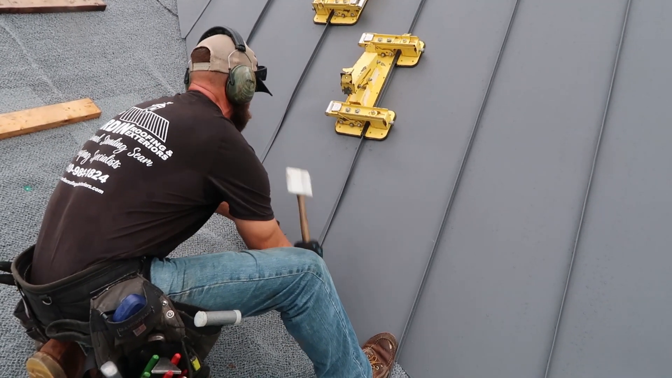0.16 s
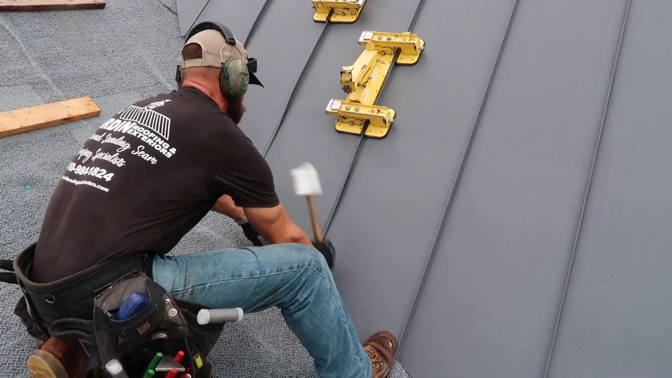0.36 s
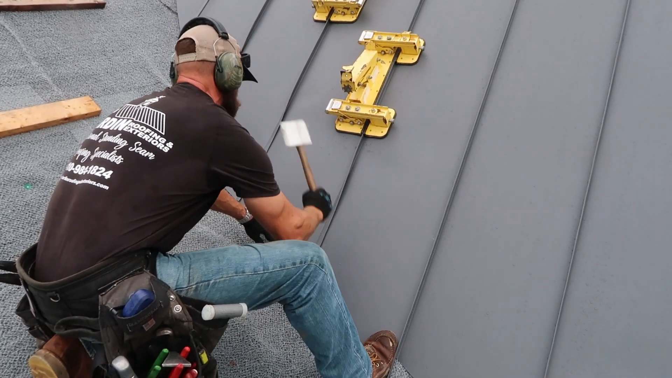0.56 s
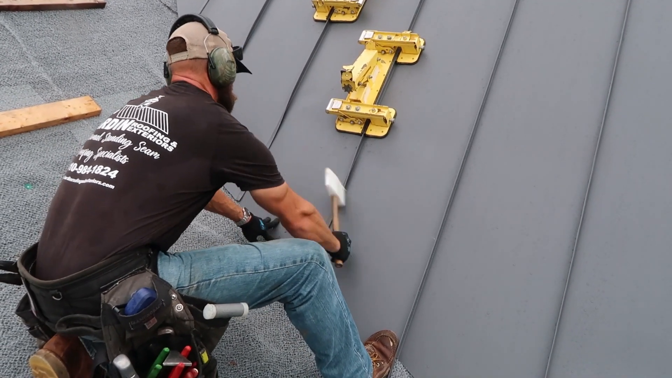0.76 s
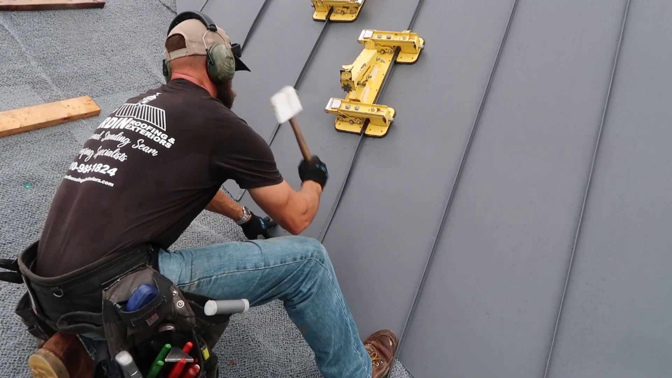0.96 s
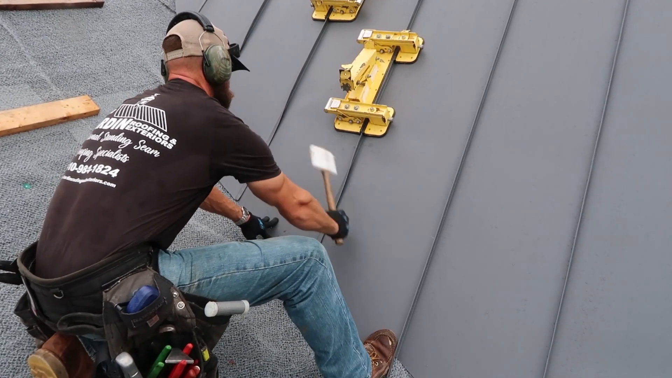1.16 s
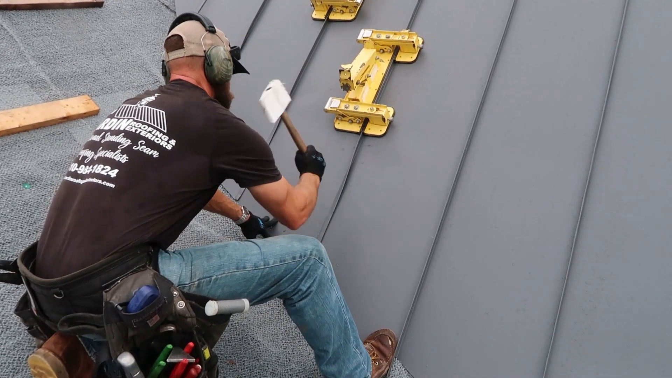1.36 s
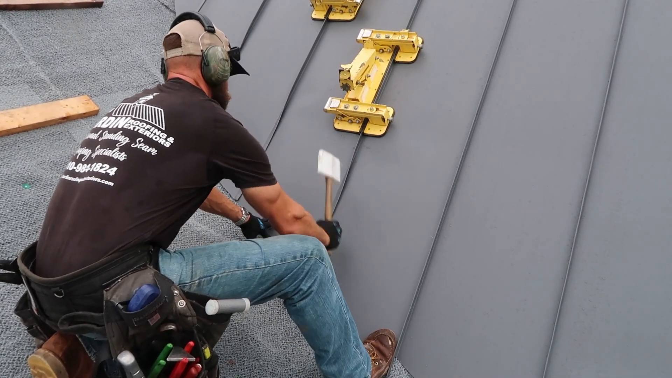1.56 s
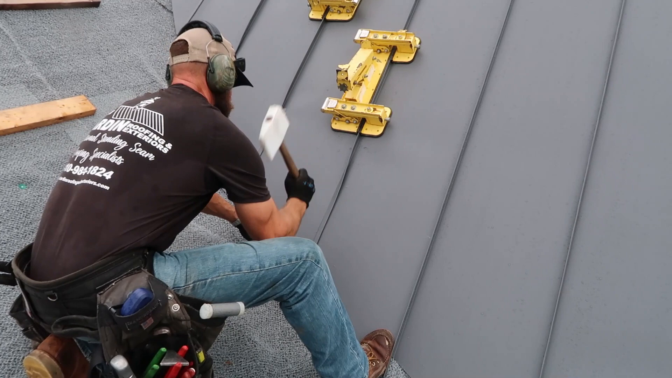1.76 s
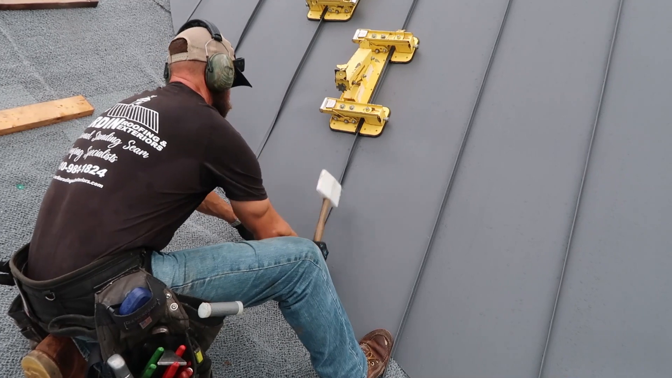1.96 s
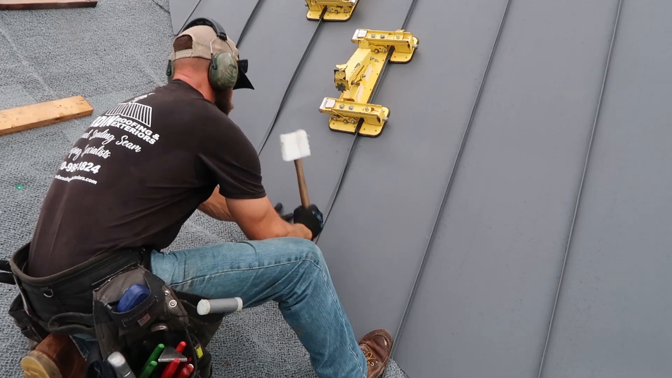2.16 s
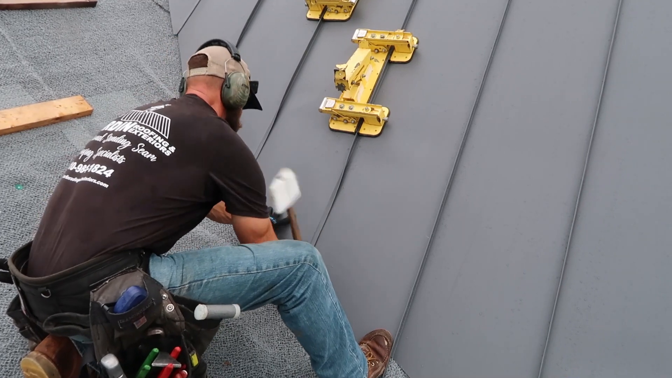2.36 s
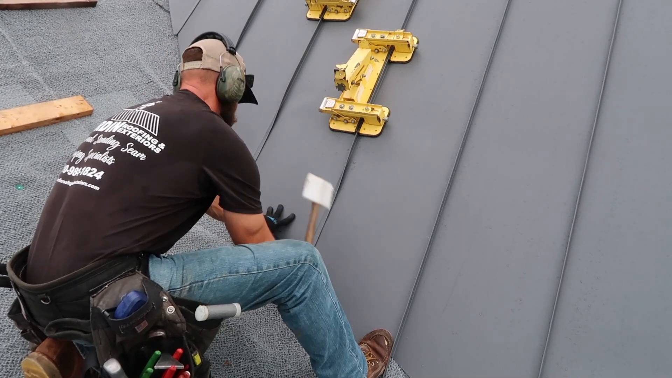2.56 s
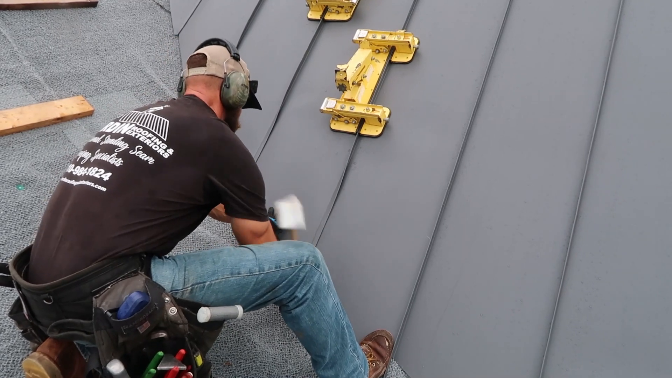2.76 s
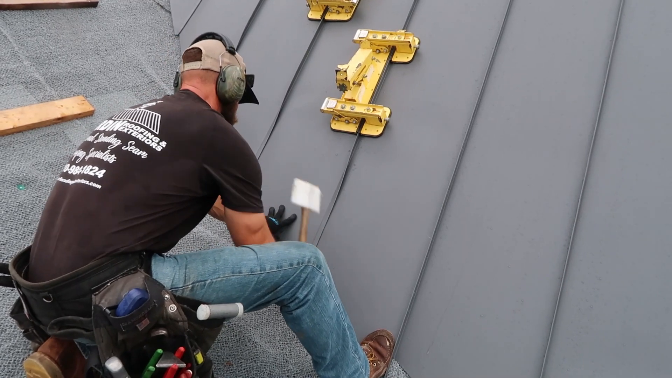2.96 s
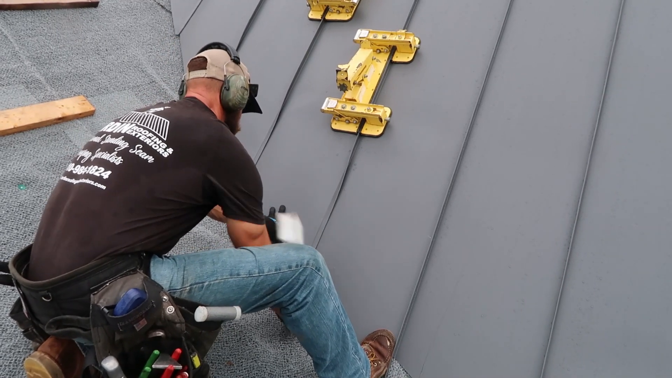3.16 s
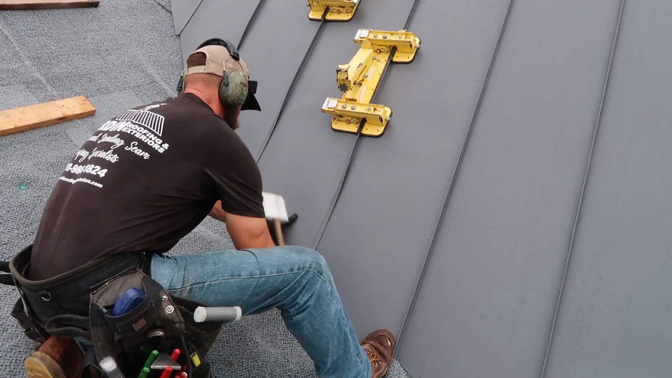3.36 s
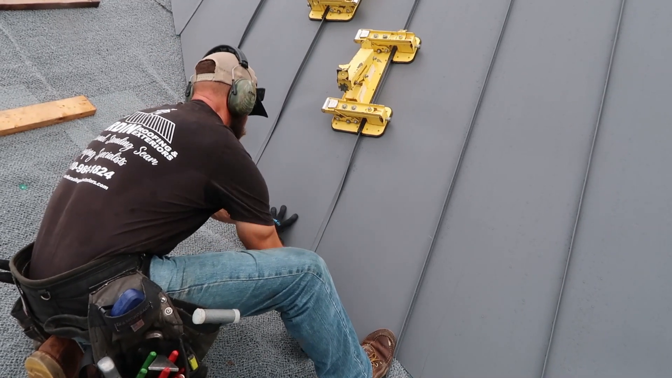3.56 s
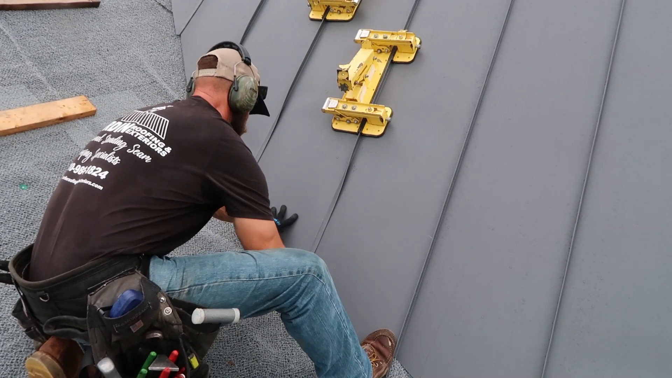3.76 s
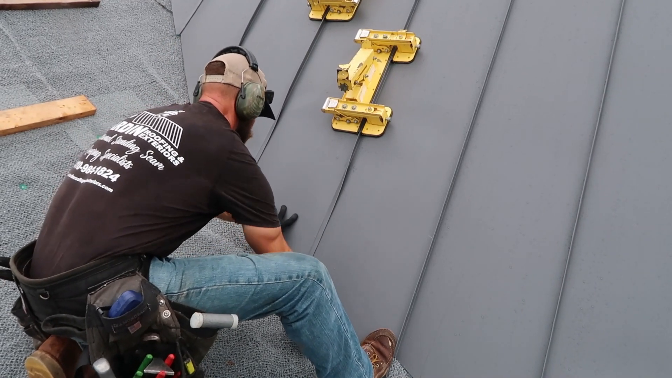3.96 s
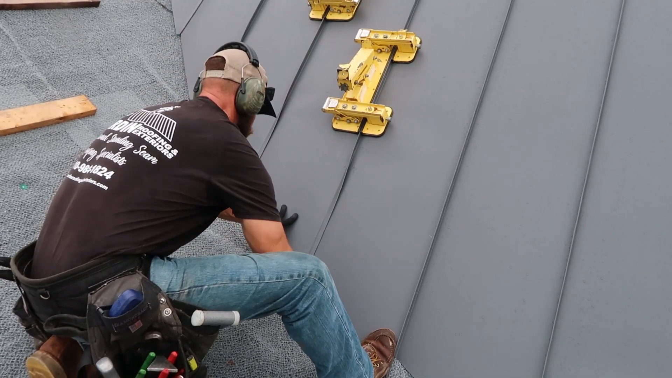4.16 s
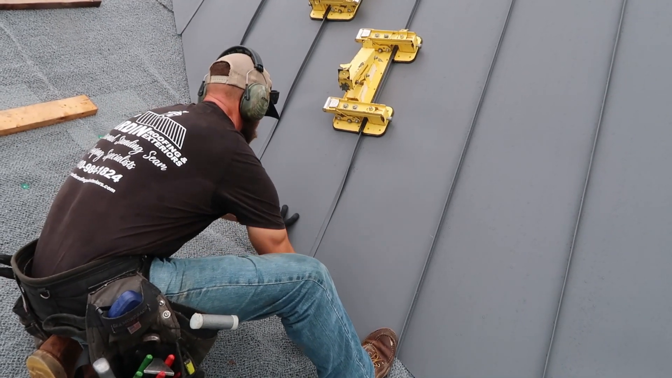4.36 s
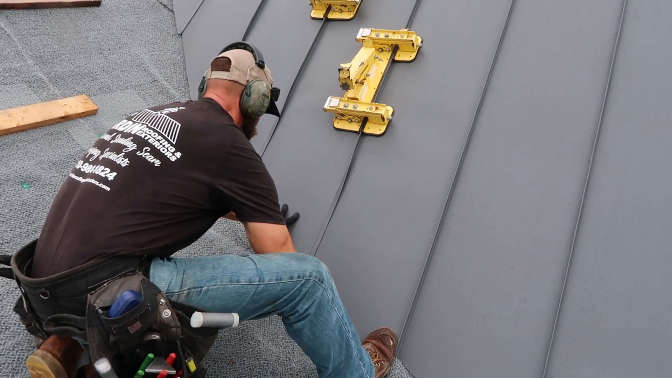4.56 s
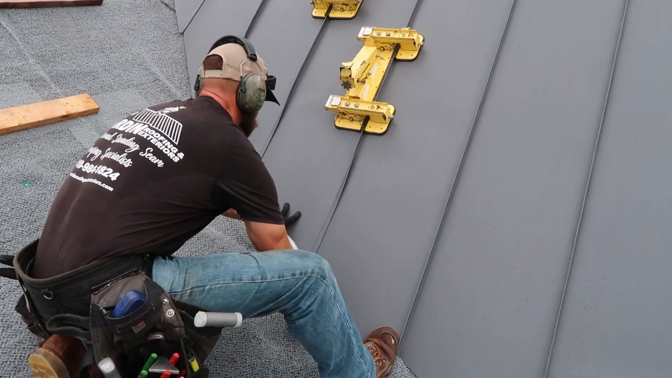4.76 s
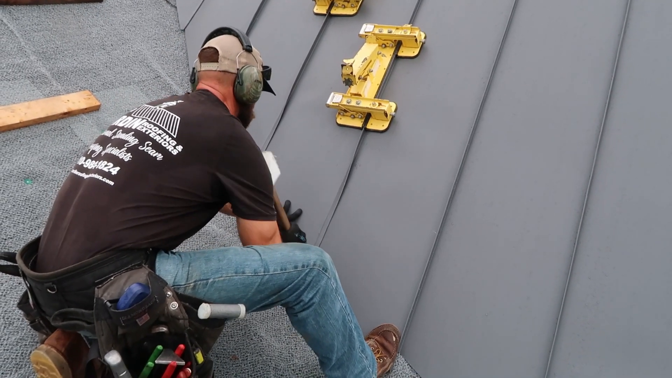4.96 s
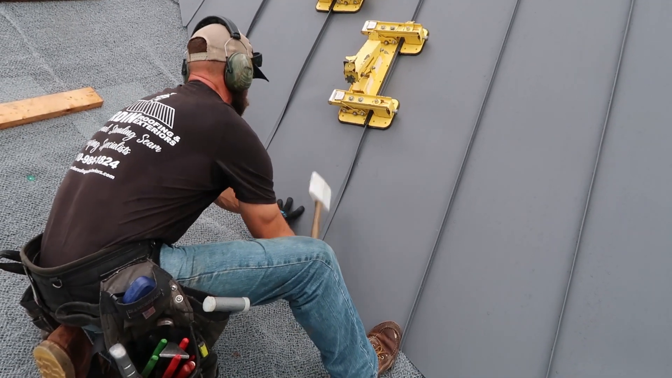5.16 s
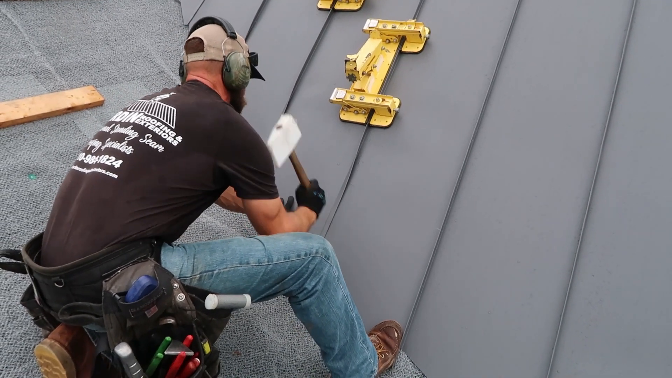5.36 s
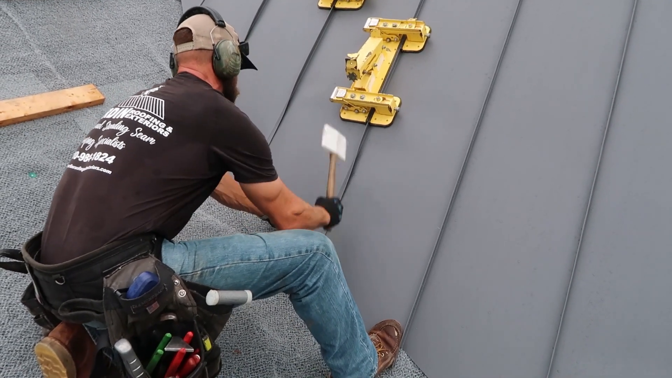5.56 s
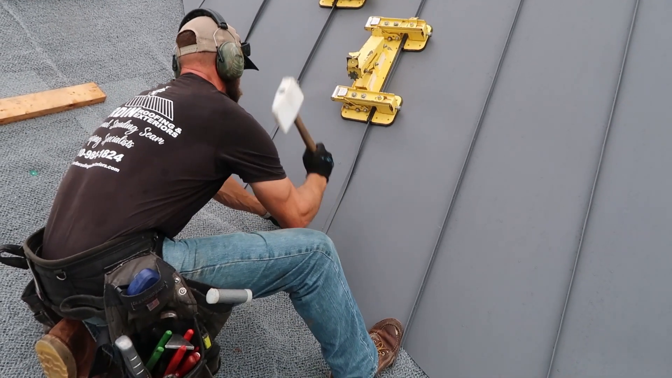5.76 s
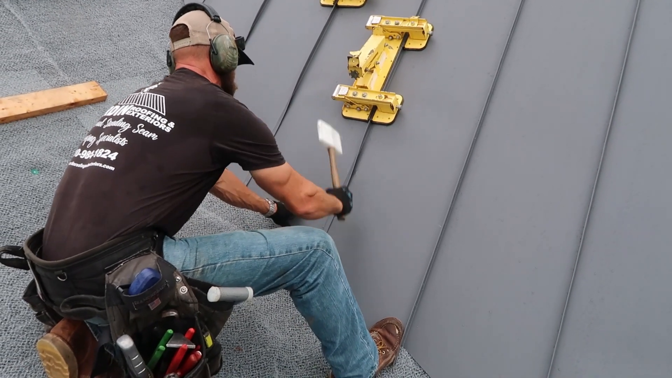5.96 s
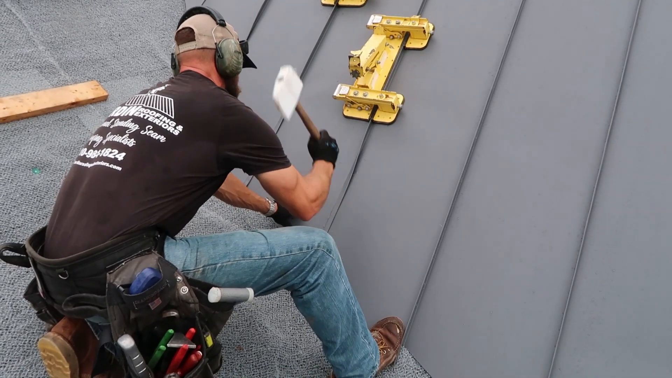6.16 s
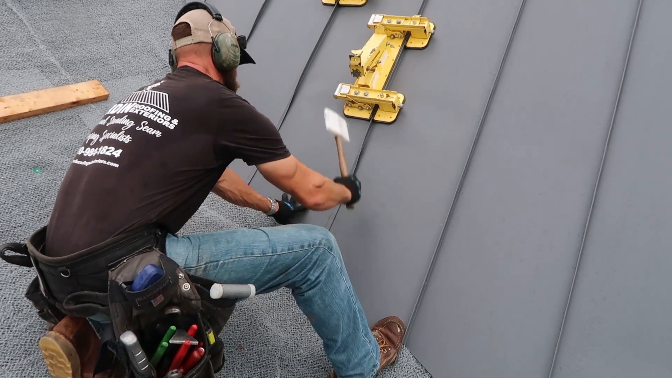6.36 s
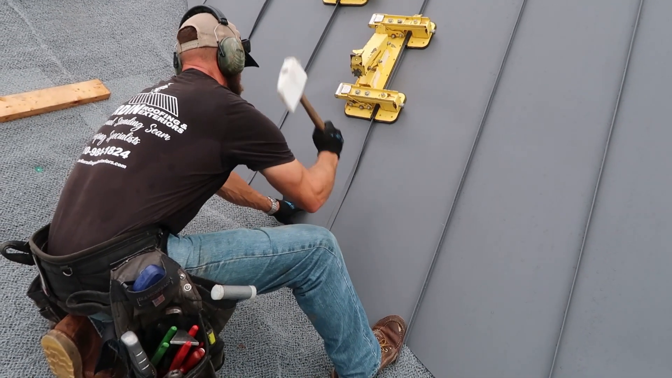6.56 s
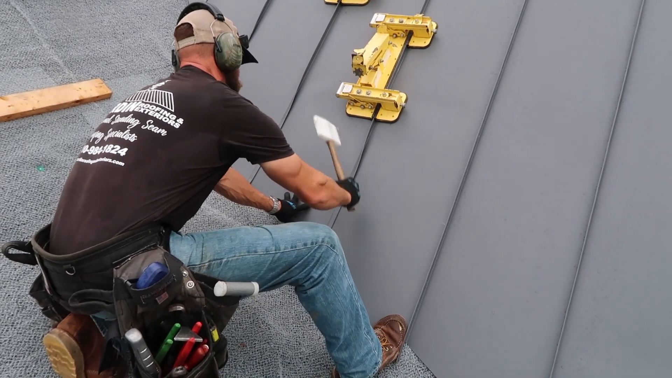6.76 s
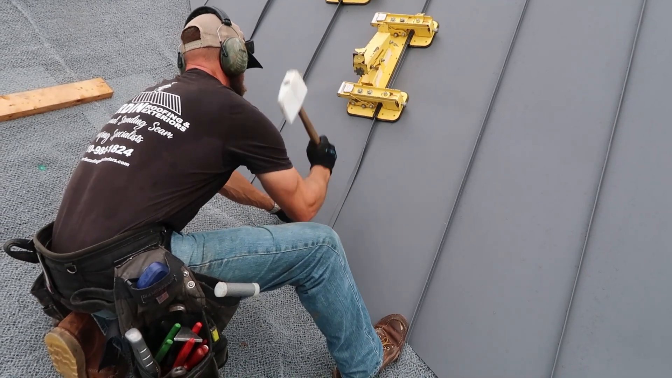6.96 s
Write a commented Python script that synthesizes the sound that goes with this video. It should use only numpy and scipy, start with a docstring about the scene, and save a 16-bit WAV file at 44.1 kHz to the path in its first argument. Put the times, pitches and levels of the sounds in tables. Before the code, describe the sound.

Outdoors on a roof, a hammer beats sheet metal at an almost even pace from start to end. The hits are hard, dry and bright, dying within a fraction of a second. Early ones knock solidly, middle ones sound hollow with the loose sheet slapping its deck, and the last are duller and tighter. A close stereo microphone also catches soft distant rumble and faint thin hiss.

```python
"""A low outdoor rumble and a thin high hiss are heard first, then a hammer closing a standing seam on a roof.
About 2.6 blows a second each excite damped modes of deck, panel and steel, the clank and crack of the
folded seam, and a dense field of bending waves in the panel; the loosest sheet also slaps back on its deck.
Faint echoes return from nearby roofs and walls; rumble and hiss are filtered noise.
The camera's gain control ducks after the blows, peaks are softly clipped and the top band is cut off."""
import sys
import numpy as np
from scipy import signal
from scipy.fft import rfft, irfft, next_fast_len
from scipy.io import wavfile
from scipy.ndimage import map_coordinates

SR = 44100
rng = np.random.default_rng(int(sys.argv[2]) if len(sys.argv) > 2 else 0)


def transcribe(u):
    """Save the signal u as a 16-bit wav file named by the first command-line argument.

    u: samples, shape (n,) or (channels, n), limited to [-1, 1]; the rate is SR.
    q: integer samples, one column per channel.
    """
    v = np.clip(np.atleast_2d(u).T, -1, 1)
    q = np.round(v * 32767).astype(np.int16)
    wavfile.write(sys.argv[1], SR, q)


N = 310019  # length [samples]

THUD_DB, THUD_LOSS = 0.74, 0.56  # average thud [dB]; loss [dB per dB of looseness]: a lifted sheet passes less
HARDNESS_DB, HARDNESS_PER_CLANK = -1.15, 0.5  # top of the crack: average [dB]; [dB per dB of clank]
# panel treble: average [dB]; [dB per dB of looseness]; [dB per dB of crack]
SHIMMER_DB, SHIMMER_PER_LOOSE, SHIMMER_PER_CRACK = 0.83, 0.65, 0.6
SLAP_DELAY_S, SLAP_ABOVE_DB = 0.017, 5  # delay after the blow [s]; looseness above which the sheet slaps [dB]

# Hammer blows, levels against an average blow; looseness is how freely the sheet rings at that spot:
# (time [s], looseness [dB], knock [dB], clank [dB], crack [dB], clank pitch [Hz], seam ring pitch [Hz])
HAMMER_BLOWS = [(0.1238, 0, 1.5, 1.5, -3, 880, 3220), (0.5045, 1, 5, 3, -1.1, 730, 2520),
                (0.874, 0, 0, 0, -2, 740, 2570), (1.2438, 0, -9, 0, -0.5, 720, 2460),
                (1.6188, -2, 2.5, 3.5, 0, 860, 2456), (1.9891, -3.5, 6, -3.5, -4.5, 930, 2680),
                (2.5226, -1, -2, 0.5, -3.5, 840, 3050), (2.907, -1, 2.5, -2, -2.3, 565, 2544),
                (3.3033, 0.3, 1.5, 0, -1.3, 595, 2820), (3.6761, 6.5, -8, -0.5, -3, 810, 3310),
                (4.0521, 2.3, -4, 1.5, -5, 595, 3400), (4.4361, 8, -6, 0, -1, 835, 2480),
                (4.8053, 3, -1.5, 2, -1, 870, 3890), (5.187, 0.2, 2.5, 5, 0, 710, 3255),
                (5.5725, -1, 7, 2, -2, 885, 2470), (5.9814, -0.2, 5, -4.5, 0.1, 570, 3136),
                (6.3859, -2.5, 4, -3, 0.6, 555, 2457), (6.7841, -4, 1.5, -7.5, -.5, 570, 2407)]


def hammering():
    """Impact excitation: each blow is a contact plus a panel response; a loose sheet thuds less and rings more."""
    t = np.arange(SR // 3) / SR
    pattern = rng.standard_normal((2, len(t)))
    out = np.zeros((2, N + SR))
    for s, loose_db, knock_db, clank_db, crack_db, clank_hz, seam_hz in HAMMER_BLOWS:
        thud_db = THUD_DB - THUD_LOSS * loose_db
        hardness_db = HARDNESS_DB + HARDNESS_PER_CLANK * clank_db  # a square hit is harder
        treble_db = SHIMMER_DB + SHIMMER_PER_LOOSE * loose_db + SHIMMER_PER_CRACK * crack_db
        add(out, s, contact(t, thud_db, knock_db, clank_db, clank_hz, crack_db, hardness_db, seam_hz))
        add(out, s, panel(t, pattern, loose_db, treble_db))
        if loose_db > SLAP_ABOVE_DB:
            add(out, s + SLAP_DELAY_S, slap(t))
    return out[:, :N]


# Modes of the wooden deck under the seam: (frequency [Hz], level [dB], t60 [s])
DECK_MODES = [(146, -8.5, 0.036), (205, -13.5, 0.019)]
# Modes of the panel flexing next to the seam: (frequency [Hz], level [dB], t60 [s])
KNOCK_MODES = [(318, -10.5, 0.11), (343, -4.5, 0.05)]
# Modes of the folded seam and the hammer head: (frequency [Hz], level [dB], t60 [s])
STEEL_MODES = [(1170, -6.5, 0.025), (1710, 2, 0.017), (2004, -14.5, .04), (2598, -1, 0.056),
               (3340, -5.5, 0.067), (3470, -7.5, 0.064), (4200, -7, 0.048), (5060, -9, 0.036)]
# Spectrum of the hammer face on the fold: (frequency [Hz], density [dB per Hz])
CRACK_SPECTRUM = [(300, -17), (1000, 2.5), (1500, 0.5), (2100, -8), (3600, -4), (5000, -11), (7000, -17),
                  (10000, -22.5), (13000, -23.5), (16000, -39)]


def contact(t, thud_db, knock_db, clank_db, clank_hz, crack_db, hardness_db, seam_hz):
    """Modal superposition: thud of the deck, knock of the panel, clank and crack of the fold, short steel ring."""
    thud = amp(thud_db) * ring(t, DECK_MODES, scatter_db=2.3, detune=0.017, attack=0.0005)
    knock = ring(t, KNOCK_MODES, scatter_db=4.5, detune=0.007, attack=0.000093)
    knock = amp(knock_db - 15) * level(knock, 0.0084)
    clank = amp(clank_db - 14) * level(mode(t, clank_hz, t60=0.018, attack=0.0021), 0.011)
    grit = snaps(t, spread=0.0045, count=6) + amp(-4.5) * crunch(t, t60=0.041, count=56)
    crack = amp(-13) * level(coloured(grit, CRACK_SPECTRUM, width_db=1.5), 0.008)
    # a harder contact is brighter
    crack = filtered(crack, lambda hz: amp(hardness_db * along([(3500, 0), (6000, 0.84)], hz)))
    steel = ring(t, STEEL_MODES, scatter_db=2, detune=0.02, attack=0.00016)
    steel = amp(-26) * level(steel, 0.054)
    seam = amp(-28) * level(mode(t, seam_hz, t60=0.081, attack=0.00022), 0.044)
    return thud + knock + clank + amp(crack_db) * (crack + steel + seam)


def mode(t, hz, t60, attack):
    """Damped harmonic oscillator: a struck resonance swings about rest and decays exponentially."""
    swing = np.sin(2 * np.pi * hz * t) * amp(-60 * t / t60) * (1 - np.exp(-t / attack))
    return np.gradient(swing) * SR / (2 * np.pi * hz)  # the air follows the speed of the surface


def ring(t, modes, scatter_db, detune, attack):
    """Modal superposition: strengths and pitches of the modes vary at random from blow to blow."""
    out = 0
    for hz, db, t60 in modes:
        strength, shift = rng.standard_normal(2)
        out = out + amp(db + scatter_db * strength) * mode(t, hz * (1 + detune * shift), t60, attack)
    return out


def snaps(t, spread, count):
    """Impulse train: the layers of the fold snap together one after another, the first hardest."""
    order = np.arange(count)
    starts = ((order + rng.uniform(0.1, 0.9, count)) * spread / count * SR).astype(int)
    clicks = np.zeros((2, len(t)))
    clicks[:, starts] = amp(-2.3 * order) * rng.choice([-1, 1], (2, count))
    return level(clicks, 0.0051)


def crunch(t, t60, count):
    """Additive synthesis: random short damped tones sum to a brief, rough, bright crunch within the crack."""
    brief = t[:SR // 16]
    hz = rng.uniform(1200, 15000, (2, count, 1))
    sizes = amp(3.9 * rng.standard_normal((2, count, 1)))
    cycles = hz * brief + rng.random((2, count, 1))
    tones = (sizes * np.sin(2 * np.pi * cycles)).sum(1)
    tones = tones * amp(-60 * brief / t60) * (1 - np.exp(-brief / 0.0005))
    return level(np.pad(tones, ((0, 0), (0, len(t) - len(brief)))), 0.0083)


BODY_PER_LOOSE, BOOM_PER_LOOSE = 0.8, 1.5  # panel ring and boom [dB per dB of looseness]

# Decay of the bending waves: (frequency [Hz], t60 [s])
PANEL_DAMPING = [(60, 0.16), (330, 0.3), (900, 0.23), (2000, 0.17), (4000, 0.14), (12000, 0.15)]
# Dense modes of the panel, its body: (frequency [Hz], density [dB per Hz])
BODY_SPECTRUM = [(30, -16.5), (60, -2.5), (130, -10.5), (240, -5), (340, -1), (400, -0.5), (470, -9.5),
                 (600, -2.5), (900, -2.5), (1200, -6), (1600, -21), (2600, -51)]
# Dense modes of the panel, its treble: (frequency [Hz], density [dB per Hz])
SHIMMER_SPECTRUM = [(900, -29), (1600, -1.5), (2100, -0.5), (2600, -3.5), (3400, -5), (5000, -14.5),
                    (7000, -22), (10000, -31.5), (13000, -36), (16000, -56)]
# The whole panel booming on its deck: (frequency [Hz], level [dB], t60 [s])
BOOM_MODES = [(47.7, -31.5, 0.38), (76, -35, 0.11)]


def panel(t, pattern, loose_db, treble_db):
    """Diffuse bending-wave field: noise with frequency-dependent damping, partly shared by all blows."""
    waves = 0.5 * pattern + rng.standard_normal(pattern.shape)
    hz, s, z = signal.stft(waves, SR, nperseg=256)
    decay = amp(-60 * s / along(PANEL_DAMPING, hz)[:, None])
    waves = signal.istft(z * decay, SR, nperseg=256)[1][:, :len(t)]
    # the treble builds up more slowly than the body, and flickers
    long_waves = waves * (1 - np.exp(-t / 0.0028))
    short_waves = waves * (1 - np.exp(-t / 0.0066)) * amp(0.62 * wobble(len(t), rate=120))
    body = amp(-16.5) * level(coloured(long_waves, BODY_SPECTRUM, width_db=-1), 0.05)
    shimmer = amp(-26) * level(coloured(short_waves, SHIMMER_SPECTRUM, width_db=3.5), 0.074)
    boom = ring(t, BOOM_MODES, scatter_db=0.5, detune=0.02, attack=0.0053)
    body = amp(BODY_PER_LOOSE * loose_db) * body
    boom = amp(BOOM_PER_LOOSE * loose_db) * boom
    return body + boom + amp(treble_db) * shimmer


# Spectrum of the sheet meeting the deck: (frequency [Hz], density [dB per Hz])
SLAP_SPECTRUM = [(30, -8), (55, 1.5), (150, -10), (260, -11), (420, -2.5), (600, -0.5), (1100, 0.5),
                 (1700, -12), (3000, -33.5)]


def slap(t):
    """Secondary impact: the sheet falls back with a dull decaying noise burst and a tick."""
    burst = rng.standard_normal((2, len(t))) * amp(-60 * t / 0.2)
    dull = level(coloured(burst, SLAP_SPECTRUM, width_db=3.5), 0.012)
    tick = level(coloured(snaps(t, spread=0.006, count=4), CRACK_SPECTRUM, width_db=1.5), 0.01)
    return amp(-22.5) * dull + amp(-26.5) * tick


# Spectrum of the echoes from nearby roofs and walls: (frequency [Hz], level [dB])
ECHO_SPECTRUM = [(40, -7.5), (330, 6), (900, -0.5), (2000, -17.5), (5000, -7), (12000, -5)]


def surroundings(x):
    """Diffuse reflection: convolution with a decaying noise tail gives scattered echoes of roofs and walls."""
    t = np.arange(SR // 2) / SR
    scatter = rng.standard_normal((2, len(t))) * amp(3.5 * wobble(len(t), rate=150))
    onset = np.clip((t - 0.03) / 0.019, 0, 1)  # nothing returns in the first 30 ms
    tail = coloured(scatter * amp(-60 * t / 0.72) * onset, ECHO_SPECTRUM, width_db=6.5)
    tail = tail / np.linalg.norm(tail[0])
    return signal.fftconvolve(x.mean(0)[None], tail, axes=1)[:, :N]


RUMBLE_DB, HISS_DB = 0.02, -24.5  # against the background level [dB]

# Course of the background: (time [s], level [dB])
BACKGROUND_LEVEL = [(0.0, -46), (0.23, -49.5), (1.57, -49), (2.17, -54.5), (4.07, -45.5), (4.82, -43.5),
                    (5.4, -50), (7.03, -50)]
# Spectrum of distant traffic and air: (frequency [Hz], density [dB per Hz])
RUMBLE_SPECTRUM = [(20, -9), (50, -5.5), (120, 2), (190, -8.5), (330, -8.5), (500, -17), (850, -16.5),
                   (1400, -22.5), (2200, -33.5), (4500, -45), (9000, -61.5), (16000, -71)]
# Spectrum of the thin hiss: (frequency [Hz], density [dB per Hz])
HISS_SPECTRUM = [(6000, -35), (6250, -13), (6370, -5), (6480, -9), (6580, 0), (6690, -16), (6950, -35)]


def outdoors():
    """Filtered noise: a distant rumble that swells and ebbs, and a thin wavering hiss, perhaps insects."""
    outdoors_db = np.interp(np.arange(N) / SR, *np.transpose(BACKGROUND_LEVEL))
    rumble = level(coloured(rng.standard_normal((2, N)), RUMBLE_SPECTRUM, width_db=9), N / SR)
    hiss = level(coloured(rng.standard_normal((2, N)), HISS_SPECTRUM, width_db=1), N / SR)
    # a frequency shift lets the pitch of the hiss wander by some tens of Hz
    drift = np.exp(2j * np.pi * np.cumsum(50 * wobble(N, rate=7.8)) / SR)
    hiss = (signal.hilbert(hiss, next_fast_len(N))[:, :N] * drift).real
    rumble = amp(RUMBLE_DB + wobble(N, rate=6)) * rumble
    hiss = amp(HISS_DB + hiss_dips() + 1.5 * wobble(N, rate=12)) * hiss
    return amp(outdoors_db) * (rumble + hiss)


HISS_DIP_DB, HISS_RETURN_S = 9.5, 0.33  # depth of the dip [dB] and time to return [s]


def hiss_dips():
    """Level modulation: the hiss drops at each blow and returns linearly in dB."""
    since = np.arange(N) / SR - np.array(HAMMER_BLOWS)[:, :1]
    dips = np.clip(1 - since / HISS_RETURN_S, 0, 1) * (since > 0)
    return -HISS_DIP_DB * dips.max(0)


def scene():
    """Superposition: direct hammering, its faint echoes and the outdoor background add up."""
    work = hammering()
    return work + amp(-33.5) * surroundings(work) + outdoors()


def amp(db):
    """Logarithmic level: decibels to amplitude gain."""
    return 10 ** (np.asarray(db) / 20)


def along(points, hz):
    """Logarithmic frequency scale: interpolate (frequency [Hz], value) points on it."""
    f, v = np.transpose(points)
    return np.interp(np.log(hz + 1), np.log(f), v)


def level(x, seconds):
    """Root-mean-square level: scale x to rms 1 over its first seconds."""
    return x / np.sqrt(np.mean(x[..., :int(seconds * SR)] ** 2) + 1e-20)


def filtered(x, gain):
    """Minimum-phase filtering: folding the cepstrum makes a causal filter of the given gain(hz)."""
    n = x.shape[-1]
    m = 2 * next_fast_len(n // 2 + 4096)
    cepstrum = irfft(np.log(np.maximum(gain(np.fft.rfftfreq(m, 1 / SR)), 1e-6)))
    cepstrum[1:m // 2] *= 2
    cepstrum[m // 2 + 1:] = 0
    return irfft(rfft(x, m) * np.exp(rfft(cepstrum)), m)[..., :n]


# Stereo width before each source's own offset: (frequency [Hz], side against mid [dB])
STEREO_WIDTH = [(100, -40.5), (300, -31.5), (600, -33.5), (1000, -29), (2000, -18.5), (4000, -13.5),
                (8000, -6), (14000, -5)]


def coloured(pair, spectrum, width_db):
    """Mid-side stereo: shape two signals into left and right, narrow in the bass and wider in the treble."""
    mid = filtered(pair[0], lambda hz: amp(along(spectrum, hz)))
    side = filtered(pair[1], lambda hz: amp(along(spectrum, hz) + along(STEREO_WIDTH, hz) + width_db))
    return np.array([mid + side, mid - side])


def wobble(n, rate):
    """Band-limited random modulation: a smooth curve through rate random knots a second."""
    knots = rng.standard_normal(int(n * rate / SR) + 4)
    return map_coordinates(knots, [np.arange(n) * rate / SR])


def add(out, s, sound):
    """Linear superposition: mix a sound into out at s seconds."""
    out[:, round(s * SR):][:, :sound.shape[1]] += sound


def ducked(x, threshold_db, slope, release_db_per_s, attack):
    """Automatic gain control: loud sound pulls the gain down fast, and it creeps back."""
    def smooth(v, seconds):
        """First-order low-pass: exponential averaging with this time constant."""
        return signal.lfilter([1 / (seconds * SR)], [1, 1 / (seconds * SR) - 1], v)

    loudness_db = 10 * np.log10(smooth(x.mean(0) ** 2, 0.0034) + 1e-12)
    wanted_db = slope * np.maximum(loudness_db - threshold_db, 0)
    # a running maximum on a rising ramp lets the cut shrink only at the release rate
    ramp = release_db_per_s * np.arange(N) / SR
    cut_db = np.maximum.accumulate(wanted_db + ramp) - ramp
    return x * amp(-smooth(cut_db, attack))


TOP_HZ = 15800  # band limit [Hz]

# Response of the microphone: (frequency [Hz], level [dB])
MICROPHONE_RESPONSE = [(15, -22), (30, -8.5), (45, 1.5), (13000, -2), (15000, -1), (16000, -7.5)]


def record(dry):
    """Transducer chain: microphone response, gain control, soft saturation of the peaks, steep low-pass."""
    x = filtered(dry, lambda hz: amp(along(MICROPHONE_RESPONSE, hz)))
    x = ducked(x, threshold_db=-18.5, slope=0.48, release_db_per_s=16.0, attack=0.011)
    x = x / (1 + np.abs(x) ** 8) ** (1 / 8)
    m = next_fast_len(N + SR)
    low_pass = 1 / (1 + (np.fft.rfftfreq(m, 1 / SR) / TOP_HZ) ** 60)
    return irfft(rfft(x, m) * low_pass, m)[:, :N]


dry = scene()
out = record(dry)
transcribe(out)
```